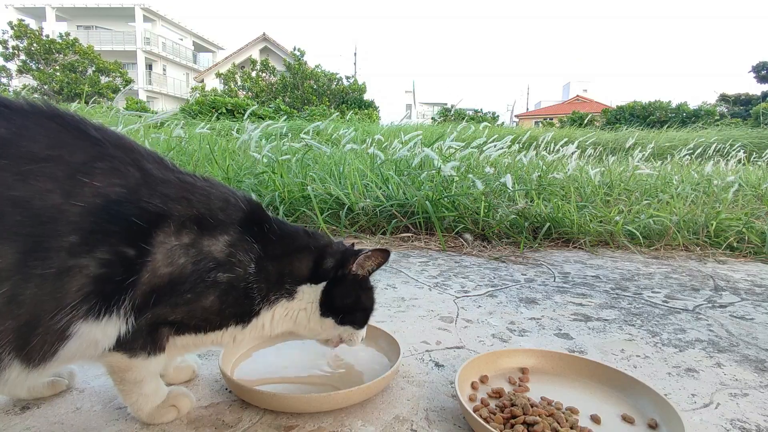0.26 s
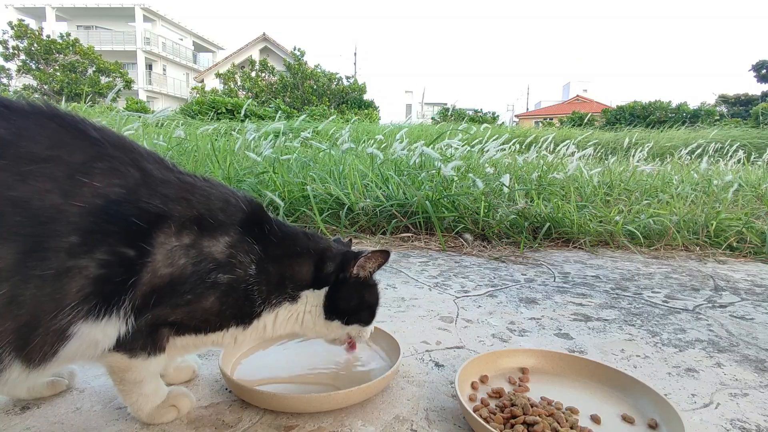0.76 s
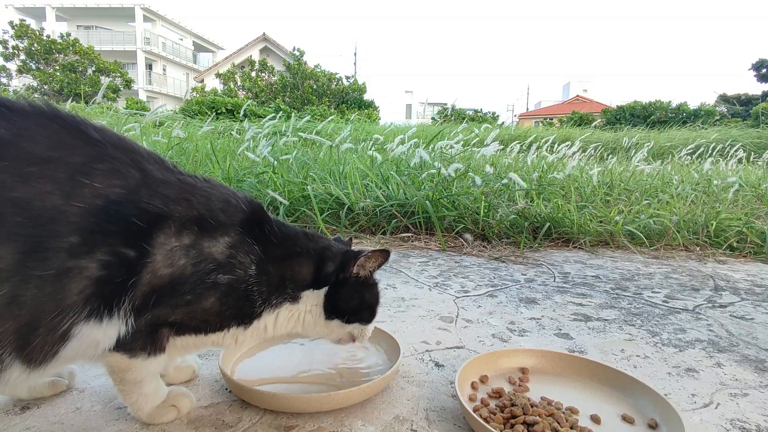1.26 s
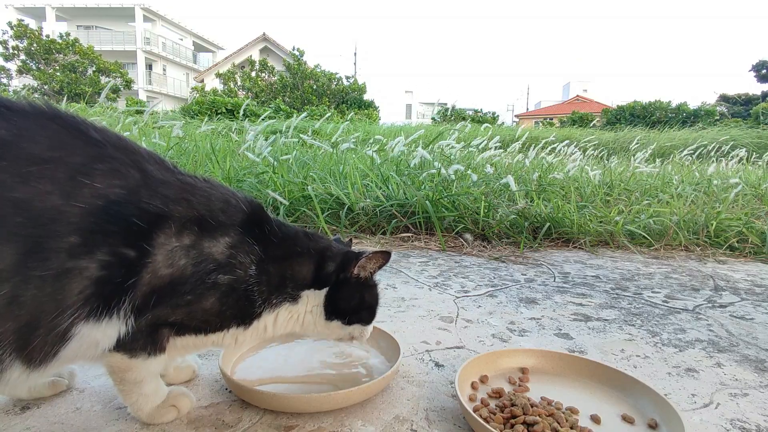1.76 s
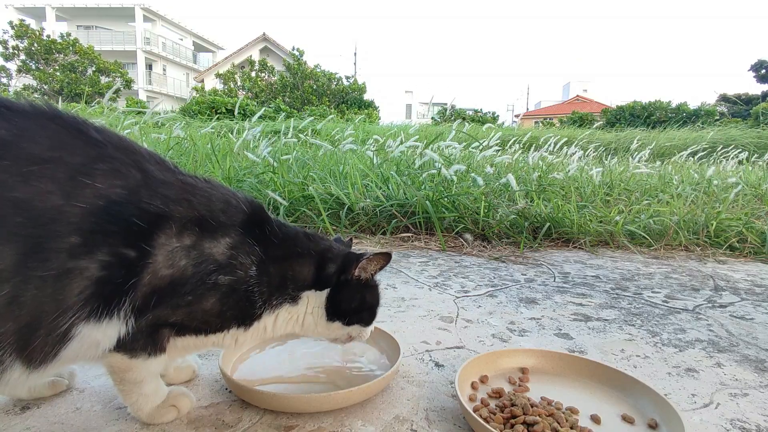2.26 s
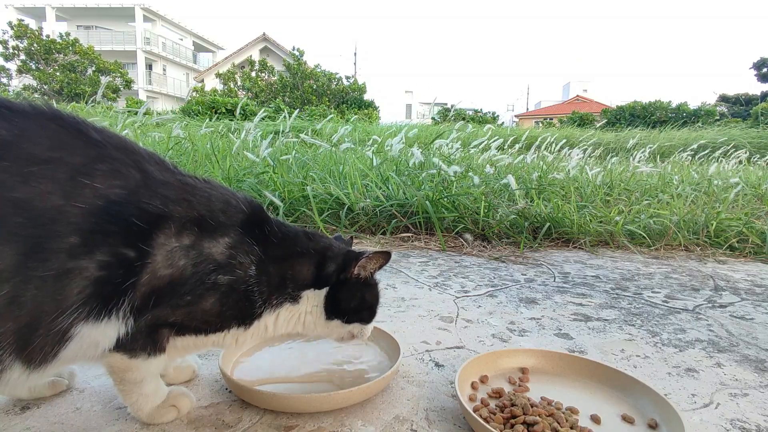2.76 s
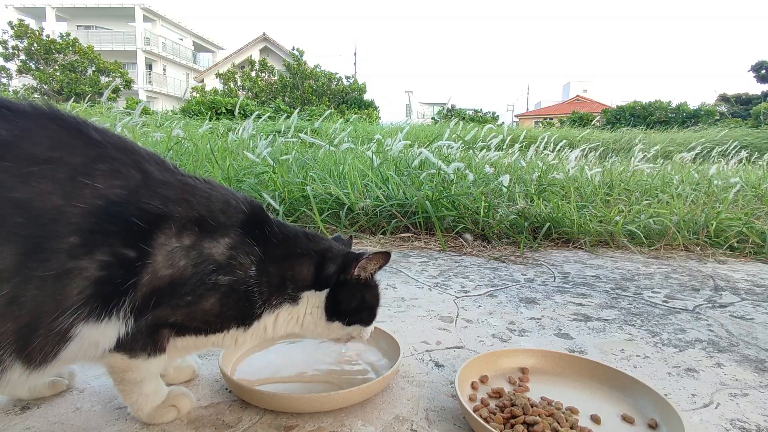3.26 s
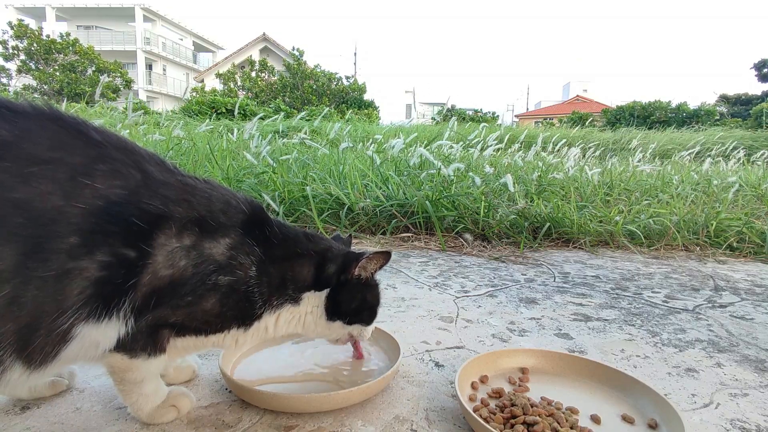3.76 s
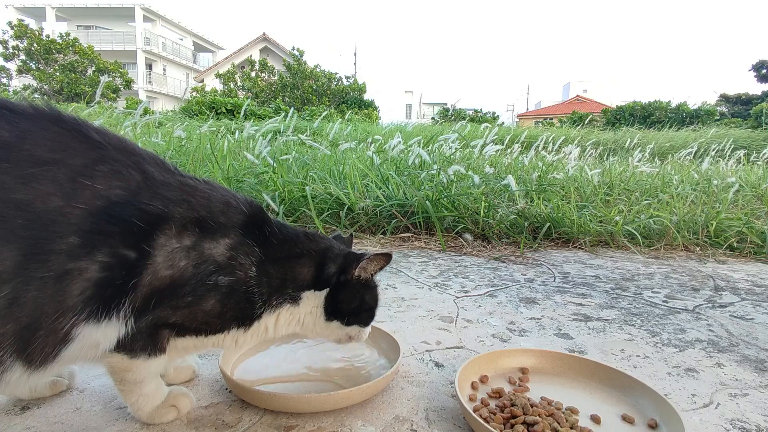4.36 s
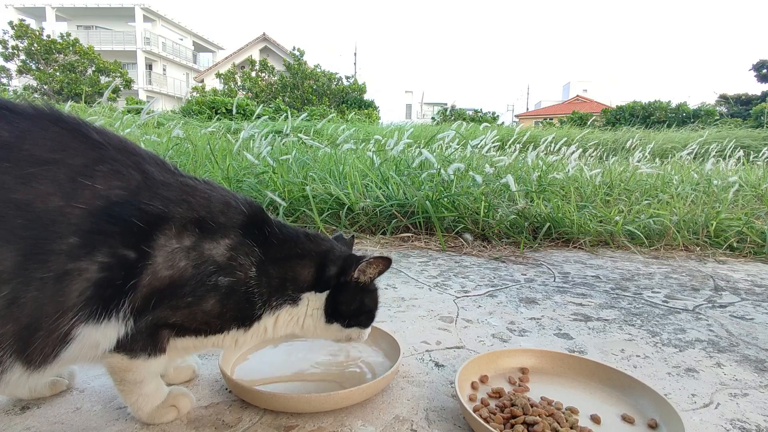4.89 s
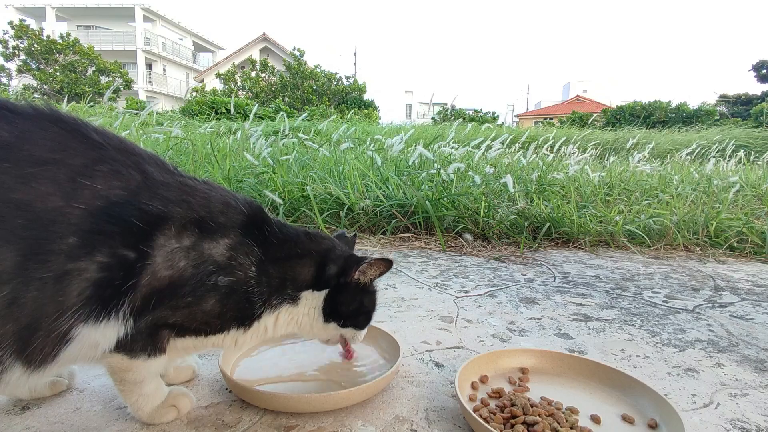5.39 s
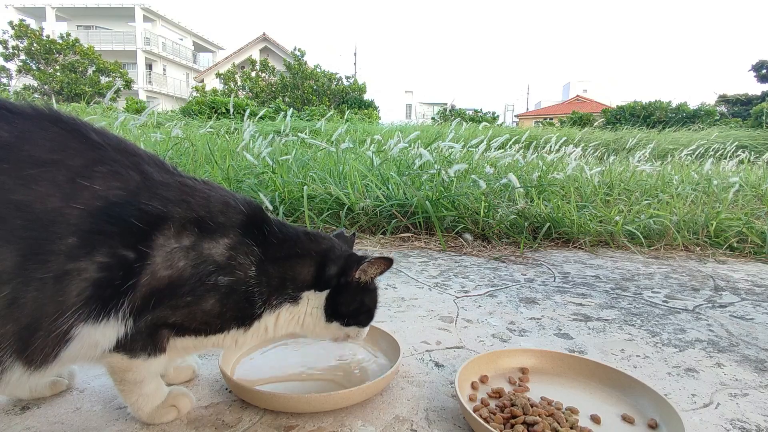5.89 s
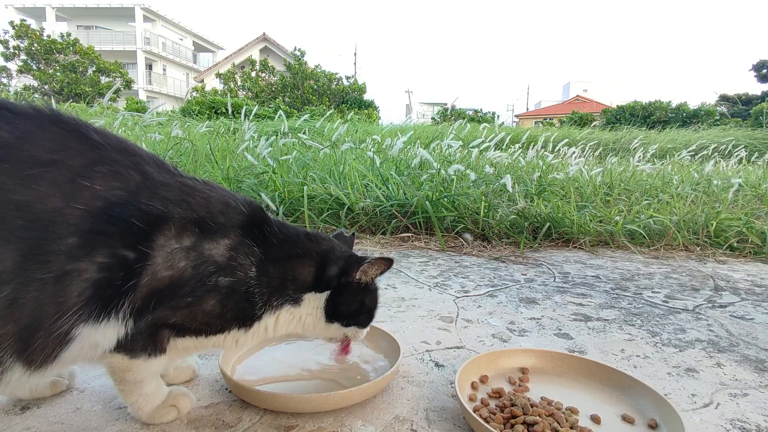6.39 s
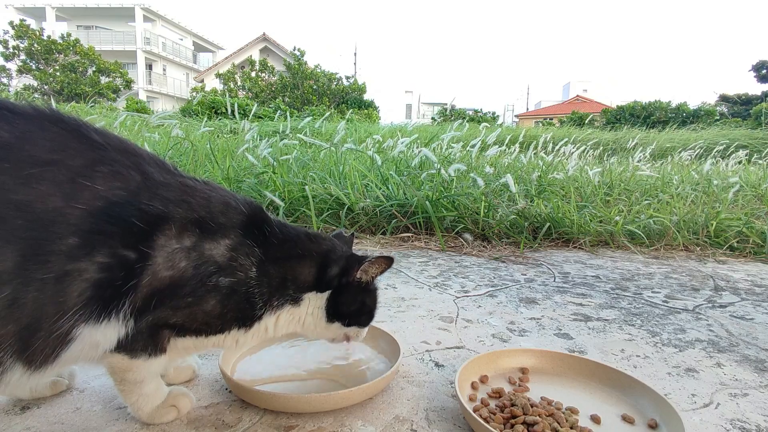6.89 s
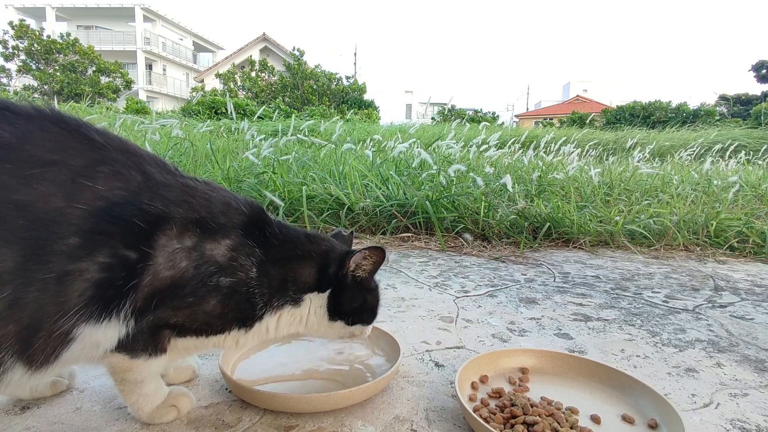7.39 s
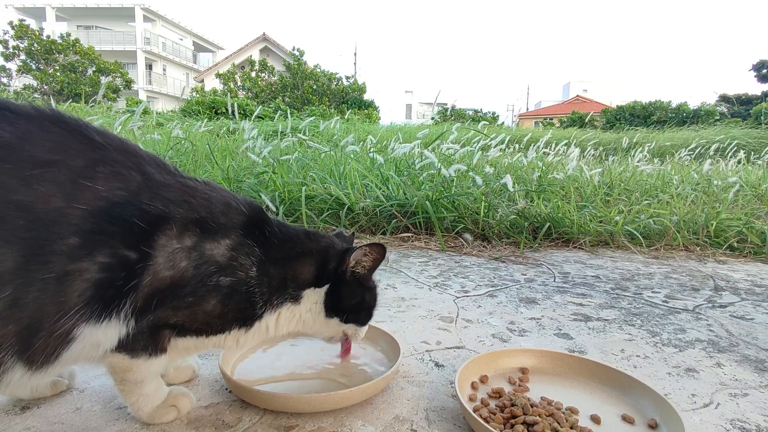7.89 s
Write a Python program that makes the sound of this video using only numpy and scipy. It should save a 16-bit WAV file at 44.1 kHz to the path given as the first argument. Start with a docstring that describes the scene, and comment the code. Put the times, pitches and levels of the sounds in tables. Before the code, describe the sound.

Close outdoor lapping: crisp wet tongue clicks and tiny splashes over a steady low traffic drone, with light wind bumps and an early dry rustle.

```python
"""Cat lapping water outdoors

A cat laps from a shallow bowl on open ground, close to a two-port microphone.
Wet clicks are short rising sine rings with splashes and spray of shaped noise; low watery blips ring longer.
Grainy noise rustles close by, and slow wind noise buffets each port on its own. Far traffic mixes
shaped noise, narrow resonances of it and a wavering tone; thin insect lines and soft air lie behind.
"""
import sys
import numpy as np
from scipy import signal
from scipy.io import wavfile
from scipy.ndimage import uniform_filter1d

SR = 44100
rng = np.random.default_rng(int(sys.argv[2]) if len(sys.argv) > 2 else 0)


def master(y):
    """Save y as 16-bit WAV."""
    cut = np.clip(np.atleast_2d(y).T, -1, 1)
    pcm = np.round(cut * 32767)  # scale
    wavfile.write(sys.argv[1], SR, pcm.astype(np.int16))


N = 358978
TIME = np.arange(N) / SR

# colour of dry grains and splashing water: f/Hz, relative level per Hz/dB
GRAIN_TONE = [(1180, -1), (2000, -1), (2360, 0), (2950, -7), (3180, -2), (4610, -3), (5480, -0.5),
              (6910, 4), (8000, -3.5), (9420, -11.5), (12300, -3.5), (15000, -9), (15600, -4)]

POCKET_S = 0.0013  # ring time of an air pocket
RERING_DB, RERING_S = -11, 0.008  # loudest repeat of the pocket, spread of the repeats in time
APART_HZ = 5000  # above this pitch the two ports hear a pocket out of step
SNAP_DB = -9
SPLASH_DB, SPLASH_S, SPLASH_PATCHY_DB = -21, 0.026, 2.5
DROPLETS_DB, DROPLETS_S = -18, 0.014  # loudest droplet, spread of the droplets in time
DROPLET_HZ, DROPLET_SPAN, DROPLET_CYCLES = 3160, 1.87, 17  # lowest pitch, ratio up to the highest
SPRAY_DB, SPRAY_S, MIST_DB = -18, 0.0015, 2  # MIST_DB lifts the spray of the droplets
BEAD_CYCLES, BEAD_MIST_DB, BEAD_MIST_S = 8, -20, 0.026
TONGUE_PAN_DB, TONGUE_LAG_S = -0.5, 3 / SR  # the right port hears the bowl a little later
BLIP_CYCLES, TICK_CYCLES = 9, 3.5
SCUFF_PAN_DB = -2  # left-right
# a far vehicle crosses: nearest moment, distance, speed, longest delay between the ports
NEAREST_S, DISTANCE_M, SPEED_M_S, PORT_LAG_S = 2.95, 54.7, 21.3, 0.00047
ROAR_DB, ROAR_ALIKE = -34.5, 0.59  # level when nearest, left-right likeness
RUMBLE_DB, RUMBLE_FOLLOWS = -28, 0.19  # the rumble swells a little with the drone (dB per dB)
STEADY_SHARE, WAVER_HZ = 0.84, 3.5  # tone's weight in the drone, typical pitch waver
HUM_HZ = 46.6
DRAUGHT_DB, AIR_DB = -38.5, -43.5
CEILING, EDGE_HZ = 0.75, 15750  # ceiling of the soft limiter, upper band limit


def gain_of(db):
    """Amplitude factor of a level in dB."""
    return 10 ** (np.asarray(db) / 20)


def evened(x):
    """Scales a signal to an rms of 1."""
    return x / np.sqrt(np.mean(x ** 2) + 1e-20)


def read(points, hz):
    """Reads a curve over log frequency; silent (-120 dB) outside its points."""
    f, value = np.transpose(points)
    return np.interp(np.log(hz + 1), np.log(f + 1), value, -120, -120)


def curves(rows):
    """Draws each column of a timed table as a line over the whole scene."""
    s, *columns = np.transpose(rows)
    return [np.interp(TIME, s, column) for column in columns]


def panned(db, pan_db):
    """Left and right gains, set apart by pan_db (positive is louder left)."""
    return gain_of(np.array([db + pan_db / 2, db - pan_db / 2]))


def add(mix, s, sound):
    """Lays a sound into the mix at s seconds, cut off at the end."""
    part = mix[:, round(s * SR):][:, :sound.shape[1]]
    part += sound[:, :part.shape[1]]


def swell(length):
    """A quick rise to 1 at a third of the length, and a slower fall."""
    length = max(length, 0.0005)
    u = np.arange(round(4 * length * SR)) / SR / length
    return np.e * 3 * u * np.exp(-3 * u)


def resonate(x, hz, width):
    """Narrow resonance: shifts the curve hz down to zero, smooths twice, and shifts back."""
    turn = np.exp(2j * np.pi * np.cumsum(hz * np.ones(N)) / SR)
    r = np.exp(-np.pi * width / SR)
    smooth = signal.lfilter([1], [1, -2 * r, r * r], x / turn)
    return 2 * (turn * smooth).real


def noise(tone, size=1024, alike=0.99, patchy_db=1.0, flicker_db=0.0, moving=False):
    """Two ports of random short-time spectra with drifting patches and a flicker shared by all pitches."""
    # left-right likeness: f/Hz, correlation
    likeness = [(30, 1), (130, 0.98), (300, 0.95), (600, 0.86), (950, 0.066), (1300, -0.37), (2000, 0.15),
                (3000, -0.19), (6500, -0.032), (15000, -0.054)]
    # colour difference of the ports: f/Hz, left-right/dB
    port_tilt = [(100, 0), (300, .5), (1200, 0), (4000, 0.5), (6000, -1), (7000, 2.5), (7600, -2),
                 (8100, 12.5), (8700, 9), (9200, 2), (9800, -1), (11500, 0.5), (14000, -1)]
    hop = size // 4
    frames, hz = N // hop + 5, np.fft.rfftfreq(size, 1 / SR)
    a, b, c, d, patches = rng.standard_normal((frames, len(hz), 5)).T
    patches = uniform_filter1d(patches, size=8, axis=0)
    patches = evened(uniform_filter1d(patches, size=12, axis=1))
    flicker = evened(uniform_filter1d(rng.standard_normal(frames), size=3))
    if moving:
        same = ROAR_ALIKE
    else:
        same = np.clip(alike * read(likeness, np.clip(hz, 30, 15000)), -1, 1)[:, None]
    # a moving source changes its delay between the ports as it crosses
    lag = PORT_LAG_S * crossing(np.arange(frames) * hop / SR)[1] * moving
    left = a + 1j * b
    right = same * left + np.sqrt(1 - same ** 2) * (c + 1j * d)
    right = right * np.exp(2j * np.pi * hz[:, None] * lag)
    tilt = panned(0, read(port_tilt, np.clip(hz, 100, 14000)))[:, :, None]
    level_db = read(tone, hz)[:, None] + patchy_db * patches + flicker_db * flicker
    spectra = np.array([left, right]) * tilt * gain_of(level_db)
    return evened(signal.istft(spectra, nperseg=size, noverlap=size - hop)[1][:, :N])


def ping(hz, cycles, glide, phase):
    """A tiny air pocket rings for a few cycles and rises as it closes."""
    shape = swell(cycles / hz)
    turns = hz * np.arange(len(shape)) / SR
    return shape * np.sin(2 * np.pi * (turns * (1 + glide * turns / cycles) + phase))


def lapping():
    """Tongue and water: ringing pockets and bubbles amid noise of splash, spray and mist."""
    pings, splash, spray, mist = np.zeros((4, 2, N))
    clicks(pings, splash, spray)
    beads(pings, mist)
    bubbles(pings)
    pings = np.array([pings[0], np.roll(pings[1], round(TONGUE_LAG_S * SR))])
    water = noise(GRAIN_TONE, size=256, patchy_db=SPLASH_PATCHY_DB)
    fine_spray = spray * evened(resonate(water, 7700, 5200))
    fine_mist = mist * evened(resonate(water, 12500, 6000))
    return pings + splash * water + fine_spray + fine_mist


def clicks(pings, splash, spray):
    """Each click is an air pocket among weaker droplets, inside a short wide splash and a fine spray."""
    # tongue and water clicks: t/s, peak level/dB, pitch of the air pocket f/Hz, left-right/dB
    click_rows = [(0.4112, -38, 7520, 12), (1.2005, -32, 3620, 0), (1.6447, -42, 6930, -12),
                  (1.733, -31.5, 5730, -6), (1.8478, -37.5, 5770, 6), (1.9783, -34.5, 6910, -7),
                  (2.0566, -35, 6800, 0), (2.0596, -30, 5660, 0), (2.0787, -37, 5640, -1),
                  (2.0895, -40, 5450, 1), (2.312, -38, 5790, -3), (2.4108, -31.5, 3740, 1),
                  (2.4873, -37, 7130, 9), (2.4991, -32.5, 6900, -7), (2.6146, -35, 6910, -4),
                  (2.71, -30, 7400, 3), (3.0382, -42, 6780, -10), (3.0924, -32.5, 7580, 8),
                  (3.2491, -43, 6200, -4), (3.253, -37, 2840, 1), (3.2531, -35, 6290, -6),
                  (3.2553, -40, 3490, 2), (3.2869, -36, 6800, -2), (3.3897, -32, 3660, 1),
                  (3.4412, -38, 5660, -9), (3.6843, -38, 3770, -1), (3.9219, -37, 5400, -7),
                  (3.9655, -35, 3530, -1), (4.1538, -36, 4010, 8), (4.1834, -37, 3640, 8),
                  (4.2129, -38, 7080, -4), (4.6351, -38, 6910, -10), (4.6612, -36, 6850, -8),
                  (4.6846, -37, 5400, -1), (4.6941, -42, 7620, 13), (4.969, -27, 3850, 2),
                  (4.972, -45, 4010, 0), (4.9764, -49, 4030, 2), (4.983, -41, 4010, 2),
                  (5.0402, -40, 7820, 8), (5.1434, -33, 6700, -7), (5.2883, -45, 7730, 13),
                  (5.2964, -40, 7340, 9), (5.3315, -38, 6220, 6), (5.4106, -41, 7040, 13),
                  (5.6183, -41, 3880, -1), (5.6222, -40, 6240, 6), (5.6937, -37.5, 7000, 12),
                  (5.9051, -39, 7580, 10), (5.9082, -32, 6480, 3), (6.0324, -41, 6700, -3),
                  (6.0976, -32, 6965, -9), (6.1007, -42, 3470, 12), (6.1985, -37, 6680, 5),
                  (6.5541, -40, 6400, 3), (6.5804, -40, 6460, 5), (6.6672, -39, 6900, 10),
                  (6.8515, -42, 6330, 7), (6.8518, -40, 4800, -2), (6.8797, -36, 4570, 1),
                  (6.884, -37, 8100, 11), (6.9639, -36, 6930, 6), (7.0967, -40, 5640, 5),
                  (7.1772, -38, 8740, 13), (7.6064, -39, 6650, -12), (7.7639, -38, 7730, 9)]
    for (s, db, hz, pan), chance in zip(click_rows, rng.random((len(click_rows), 6, 5))):
        apart = np.array([[0], [chance[0, 0] * (hz > APART_HZ)]])
        level = panned(db, pan)[:, None]
        burst = signal.windows.hann(round(SPLASH_S * SR)) ** 2
        add(splash, s - 0.008, level * gain_of(SPLASH_DB) * burst)
        add(pings, s, level * ping(hz, hz * POCKET_S, 0.0042, chance[0, 1] + apart))
        # the film of water tears: one very short, broad snap
        add(pings, s + 0.00043, level * gain_of(SNAP_DB) * ping(6200, 2.0, 0.033, chance[0, 2]))
        # the pocket sounds twice again, weaker
        for _, pitch, size, phase, _ in chance[1:3]:
            again = ping(hz * (0.92 + 0.14 * pitch), hz * POCKET_S, 0.01, phase + apart)
            add(pings, s + 0.0021 + RERING_S * size, level * gain_of(RERING_DB - 3.1 * size) * again)
        add(spray, s + 0.0015, level * gain_of(SPRAY_DB) * swell(SPRAY_S))
        for late, pitch, size, phase, side in chance[1:]:
            start = s + DROPLETS_S * late - 0.005
            small = panned(db + DROPLETS_DB - 8 * size, pan + 6 * (side - 0.5))[:, None]
            droplet = ping(DROPLET_HZ * DROPLET_SPAN ** pitch, DROPLET_CYCLES, 0.011, phase)
            add(pings, start, small * droplet)
            add(spray, start, small * gain_of(SPRAY_DB + MIST_DB) * swell(SPRAY_S))


def beads(pings, mist):
    """Bright beads of spray ring very high, each within a fine wide mist."""
    # beads: t/s, peak level/dB, f/Hz, left-right/dB
    bead_rows = [(1.6447, -43, 14800, -1.5), (1.8517, -35, 11700, 4), (2.1266, -42, 12600, -3.5),
                 (2.1344, -46, 12500, 0.0), (2.4982, -48, 12100, -1.0), (2.7013, -44, 12600, -10),
                 (2.7122, -40, 12300, 7), (3.037, -37, 12800, -1), (3.049, -44, 12500, 0),
                 (3.3972, -34, 12800, -1.5), (4.6344, -44, 12800, -1.5), (4.9684, -40, 12600, -3),
                 (4.9741, -36, 10500, -4), (5.3343, -44, 13200, -1.5), (5.6261, -45, 12800, 2),
                 (5.904, -37, 12900, -7), (6.0315, -42, 14200, -1.5), (6.0965, -43, 12600, -8),
                 (6.203, -29, 13000, -5.5), (6.106, -42, 13500, 0), (6.8872, -40, 13700, 0.0),
                 (7.4587, -38, 11300, 0.5), (7.7575, -35, 13000, 0), (7.7656, -27, 11900, 2),
                 (7.7783, -42, 12080, 0)]
    for (s, db, hz, pan), phase in zip(bead_rows, rng.random(len(bead_rows))):
        add(pings, s, panned(db, pan)[:, None] * ping(hz, BEAD_CYCLES, 0.012, phase))
        haze = signal.windows.hann(round(BEAD_MIST_S * SR))
        add(mist, s - BEAD_MIST_S / 3, panned(db + BEAD_MIST_DB, pan)[:, None] * haze)


def bubbles(pings):
    """Bubbles chirp upward as they close."""
    # bubbles: t/s, peak level/dB, first f/Hz, last f/Hz, length/s
    bubble_rows = [(2.1265, -36.5, 3560, 8000, 0.0068), (2.4135, -48, 5500, 8000, .006),
                   (3.086, -40, 3800, 7000, .005), (6.1965, -43, 5800, 8200, .005),
                   (7.170, -47, 4400, 6600, .006), (7.4585, -39, 4250, 7800, .010)]
    for (s, db, hz, last_hz, length), phase in zip(bubble_rows, rng.random(len(bubble_rows))):
        rising = np.geomspace(hz, last_hz, round(length * SR))
        tone = np.sin(2 * np.pi * (np.cumsum(rising) / SR + phase))
        chirp = signal.windows.tukey(len(rising), 0.6) * tone
        add(pings, s, panned(db, TONGUE_PAN_DB)[:, None] * chirp)


def blips():
    """Low watery blips, some together with a click, ring longer than the clicks."""
    # blips: t/s, peak level/dB, f/Hz
    blip_rows = [(1.5384, -42, 1780), (3.685, -47, 2000), (5.694, -46, 2000), (5.2624, -42, 2060),
                 (7.4099, -43, 2390), (8.079, -40, 2250)]
    out = np.zeros((2, N))
    for (s, db, hz), phase in zip(blip_rows, rng.random(len(blip_rows))):
        add(out, s, panned(db, 0)[:, None] * ping(hz, BLIP_CYCLES, 0.011, phase))
    return out


def ticks():
    """Faint ticks of the wet tongue, very short rings at random moments and pitches."""
    out = np.zeros((2, N))
    for when, pitch, size, phase, side in rng.random((160, 5)):
        level = panned(-54 + 9 * size, 6 * (side - 0.5))[:, None]
        add(out, when * TIME[-1], level * ping(3000 * 2.7 ** pitch, TICK_CYCLES, 0.051, phase))
    return out


def rustle():
    """Fine dry grains: a slow bed of crackling noise, and scuffs that swell and fade quickly."""
    # rustle bed: t/s, level/dB
    bed = [(0.0, -52), (0.52, -51), (0.72, -39), (0.95, -46), (1.36, -42), (1.63, -49.5), (3.08, -56),
           (3.87, -47), (4.4, -55), (5.6, -68), (8.14, -55.5)]
    # short scuffs: t/s, level/dB, length/s (as in swell)
    scuffs = [(0.184, -41, 0.029), (0.221, -41.5, 0.048), (0.457, -47.5, 0.025), (0.497, -46, 0.027),
              (0.519, -37, 0.033), (0.584, -43, 0.026), (0.605, -45, 0.025), (0.637, -42, 0.052),
              (0.682, -47, 0.037), (0.725, -33.5, 0.036), (0.762, -44, 0.02), (0.8, -45, 0.019),
              (0.846, -47, 0.015), (0.89, -40.5, 0.11), (0.958, -36.5, 0.057), (1.163, -41, 0.025),
              (1.28, -38.5, 0.07), (1.339, -38, 0.031), (2.66, -46, 0.073), (2.702, -43, 0.022)]
    power = panned(curves(bed)[0], -1.1) ** 2
    for s, db, length in scuffs:
        add(power, s - 0.003, (panned(db, SCUFF_PAN_DB)[:, None] * swell(length)) ** 2)
    # stalks snap one by one: sparse spikes, about 700 a second, ride on the hiss
    snaps = gain_of(3.0 * np.minimum(rng.exponential(1, N), 4)) * (rng.random(N) < 700 / SR)
    crackle = evened(1 + 0.4 * signal.oaconvolve(snaps, swell(0.0008))[:N])
    hiss = noise(GRAIN_TONE, size=256, patchy_db=3.0, flicker_db=-1.0)
    return np.sqrt(power) * crackle * hiss


def wind():
    """Lumpy pressure, separate at each port: a light steady draught and short gusts."""
    # gusts on the ports: t at the crest/s, level/dB, half-length/s, left-right/dB
    gusts = [(0.365, -26.5, 0.24, 5), (0.582, -22, 0.045, 16), (0.672, -25, 0.09, 21),
             (0.936, -24.5, 0.46, 4), (1.135, -21.5, 0.077, 8), (1.344, -26, 0.2, 14.5),
             (1.484, -25, 0.056, 16), (2.008, -26.5, 0.052, 13), (4.27, -37, 0.39, 18),
             (4.717, -20.5, 0.2, 2), (4.942, -26, 0.09, 12), (7.76, -23.5, 0.12, 11)]
    # colour of the wind: f/Hz, relative level per Hz/dB
    wind_tone = [(8, -8), (20, 9), (45, -0.5), (90, -1.5), (160, -12.5), (400, -27)]
    power = gain_of(DRAUGHT_DB) ** 2 * np.ones((2, N))
    for s, db, half, pan in gusts:
        shape = signal.windows.hann(round(2 * half * SR))
        add(power, s - half, panned(db, pan)[:, None] ** 2 * shape ** 2)
    return np.sqrt(power) * noise(wind_tone, size=2048, alike=0, patchy_db=1.2)


def traffic():
    """Far rumble and tyre roar, with a mostly steady, wavering drone tone and narrow resonances of the noise."""
    # colours of rumble and roar: f/Hz, relative level per Hz/dB
    rumble_tone = [(15, -6.5), (30, 3), (47, 7.5), (65, 3), (130, 0.5), (160, -1.5), (190, -4.5), (230, -2),
                   (320, -8.5), (500, -11), (900, -44)]
    roar_tone = [(180, -18), (300, 1.5), (331, -13), (374, -21), (515, -6.5), (655, -8.5), (1110, -11.5),
                 (1210, -17.5), (1580, -39), (2500, -38.5), (3250, -43), (5500, -120)]
    # the drone comes and goes: t/s, level/dB
    drone_level = [(0.0, -34), (.8, -35.5), (1.5, -35.5), (1.75, -40.5), (2.24, -34), (2.47, -34.5),
                   (2.53, -29.5), (3.03, -34), (3.15, -38.5), (3.35, -40), (3.8, -31), (4.13, -28.5),
                   (4.24, -36), (4.65, -42.5), (5.4, -43.5), (5.95, -38.5), (6.05, -32.5), (6.35, -36.5),
                   (6.7, -41.5), (7.3, -39.5), (8.14, -51)]
    drone_db = curves(drone_level)[0]
    rumble = noise(rumble_tone, size=2048)
    roar = noise(roar_tone, moving=True)
    rumble_gain = gain_of(RUMBLE_DB + RUMBLE_FOLLOWS * (drone_db - drone_db.mean()))
    roar_gain = gain_of(ROAR_DB) * crossing(TIME)[0]
    tonal = gain_of(drone_db) * drone(rumble) + boom_and_hum(rumble) + moan(roar + rumble) + strands(roar)
    return rumble_gain * rumble + roar_gain * roar + tonal


def crossing(t):
    """Nearness (1 when closest) and sideways bearing of the far vehicle on a straight path."""
    along = SPEED_M_S * (NEAREST_S - t)
    distance = np.hypot(along, DISTANCE_M)
    return DISTANCE_M / distance, along / distance


def drone(rumble):
    """A tone that wavers in pitch, blended with a weaker resonance of the rumble."""
    # centre pitch of the drone: t/s, f/Hz
    drone_pitch = [(0, 258), (1.4, 255), (3.7, 250.7), (4.0, 264.2), (4.5, 262.1), (6.2, 258.8),
                   (8.14, 252.8)]
    hz = curves(drone_pitch)[0]
    fuzzy = evened(resonate(rumble, hz, 66.0))
    waver = uniform_filter1d(rng.standard_normal(N), size=1500)
    waver = evened(uniform_filter1d(waver, size=1500))
    tone = np.sqrt(2) * np.sin(2 * np.pi * np.cumsum(hz + WAVER_HZ * waver) / SR)
    return evened((1 - STEADY_SHARE) * fuzzy + STEADY_SHARE * tone)


def boom_and_hum(rumble):
    """A broad low boom and a narrow deep hum, both resonances of the rumble."""
    # levels of boom and hum: t/s, level/dB
    boom_level = [(0, -41), (1, -66), (4.6, -49.5), (5.9, -31.5), (7.2, -37.5), (8.14, -43)]
    hum_level = [(0, -36), (2.7, -36), (3.1, -39), (5.4, -31), (5.8, -52), (7.2, -30), (8.14, -34.5)]
    boom = gain_of(curves(boom_level)[0]) * evened(resonate(rumble, 82.5, 60))
    hum = gain_of(curves(hum_level)[0]) * evened(resonate(rumble, HUM_HZ, 13))
    return boom + hum


def moan(far_noise):
    """A fuzzy tone below the drone that mostly sinks, a gliding resonance of the far noise."""
    # moan: t/s, f/Hz, level/dB
    moan_path = [(3.3, 220, -59), (3.6, 215, -40.5), (4.35, 197, -33.5), (4.9, 181.2, -37.5),
                 (6, 184.4, -46), (7.5, 180, -41), (8.14, 174, -50.5)]
    hz, db = curves(moan_path)
    return gain_of(db) * evened(resonate(far_noise, hz, 45.0))


def strands(roar):
    """Fuzzy tonal strands, resonances of the roar that swell once each."""
    # strands: middle t/s, length/s, level/dB, f/Hz, width/Hz
    strand_rows = [(3.58, 0.97, -49, 1135, 57), (2.3, 1.8, -46, 543, 120), (1.37, 0.82, -51, 1125, 130),
                   (3.3, 1.6, -50, 883, 77), (4.96, 1.4, -46, 373, 56)]
    out = np.zeros((2, N))
    for s, length, db, hz, width in strand_rows:
        arch = np.cos(np.pi * np.clip((TIME - s) / length, -0.5, 0.5))
        out += gain_of(db) * arch * evened(resonate(roar, hz, width))
    return out


def insects():
    """Narrow, fuzzy whistles, resonated noise that throbs by 3 dB up and down, louder on the left."""
    # two insects: f/Hz, width/Hz, level/dB, throb rate/Hz
    insect_rows = [(7344, 160, -73, 5.7), (7810, 220, -68, 3.7)]
    out = np.zeros((2, N))
    for hz, width, db, rate in insect_rows:
        throb_db = 3 * np.sin(2 * np.pi * (rate * TIME + rng.random()))
        whistle = evened(resonate(rng.standard_normal((2, N)), hz, width))
        out += panned(db + throb_db, 16.7) * whistle
    return out


def air():
    """Soft background air: shaped noise at a constant level."""
    # colour of the air: f/Hz, relative level per Hz/dB
    air_tone = [(530, -9), (900, -0.5), (1120, -1), (1320, -1), (2000, -8), (3820, -15), (5210, -19),
                (6460, -19.5), (7640, -16), (8110, -21.5), (9360, -32.5), (10400, -27), (12200, -25.5),
                (14700, -26), (15600, -27)]
    return gain_of(AIR_DB) * noise(air_tone, size=512, patchy_db=1.64)


def scene():
    """Sums all layers, from the bowl to the background."""
    return lapping() + blips() + ticks() + rustle() + wind() + traffic() + insects() + air()


def record(dry):
    """A soft limiter rounds off the highest peaks; then a steep low-pass limits the band."""
    soft = CEILING * np.tanh(dry / CEILING)
    low_pass = signal.firwin(2047, EDGE_HZ, window=("kaiser", 10), fs=SR)
    return signal.oaconvolve(soft, low_pass[None], "same")


dry = scene()
out = record(dry)
master(out)
```